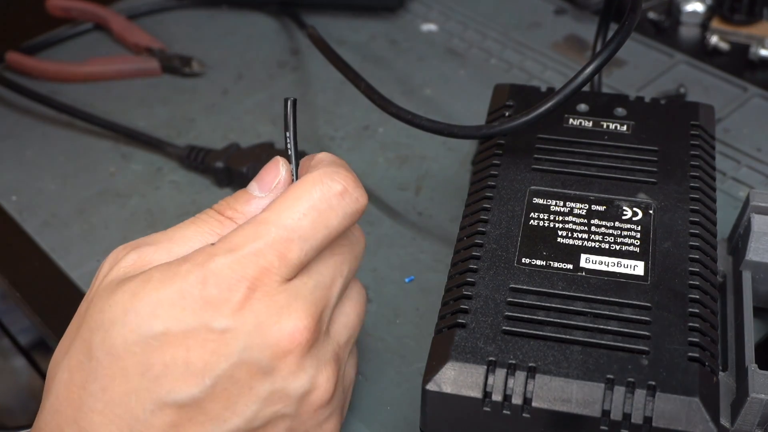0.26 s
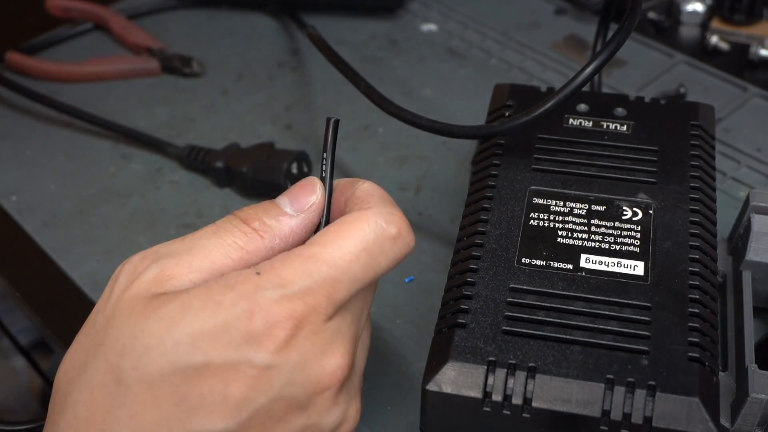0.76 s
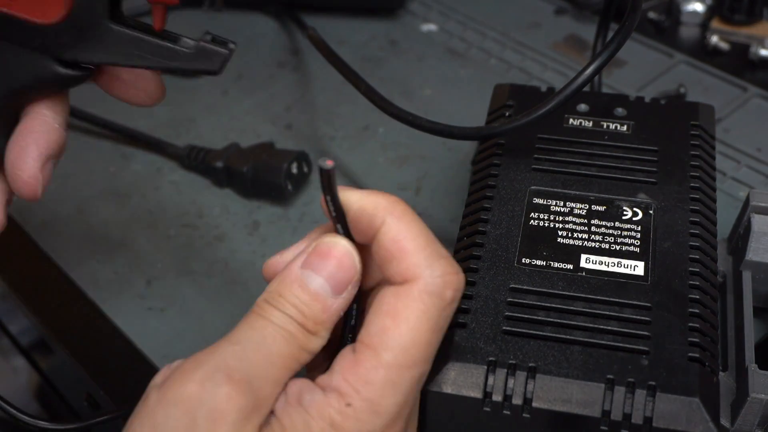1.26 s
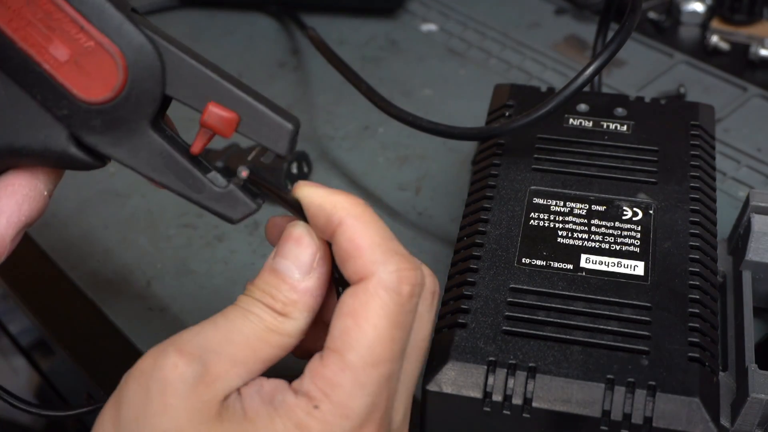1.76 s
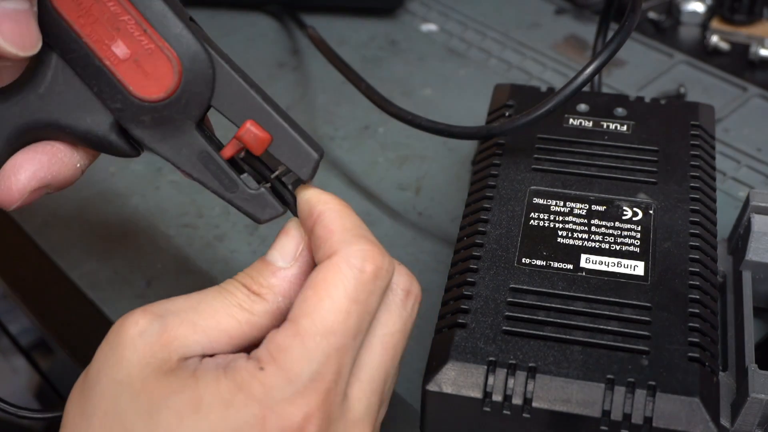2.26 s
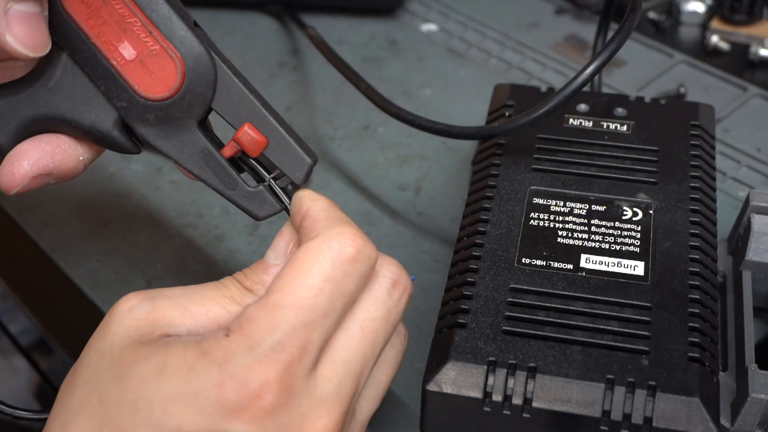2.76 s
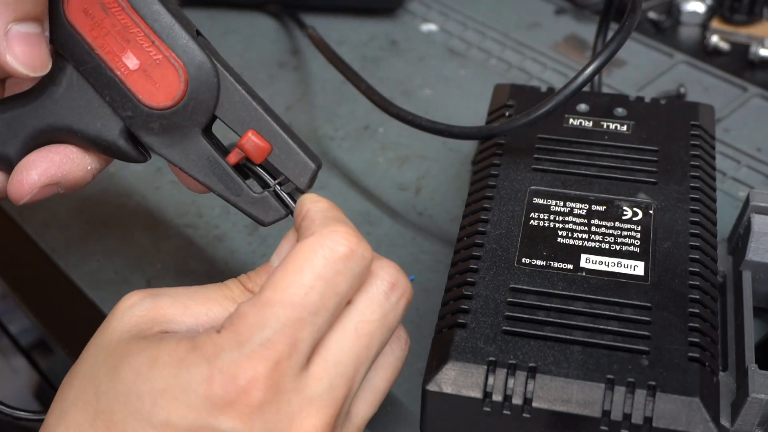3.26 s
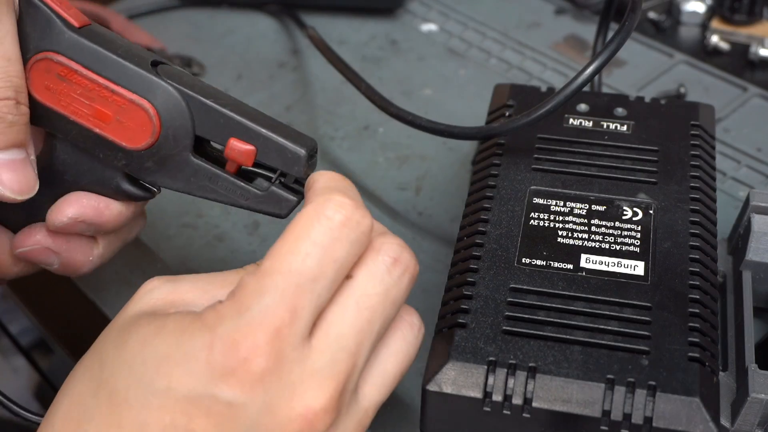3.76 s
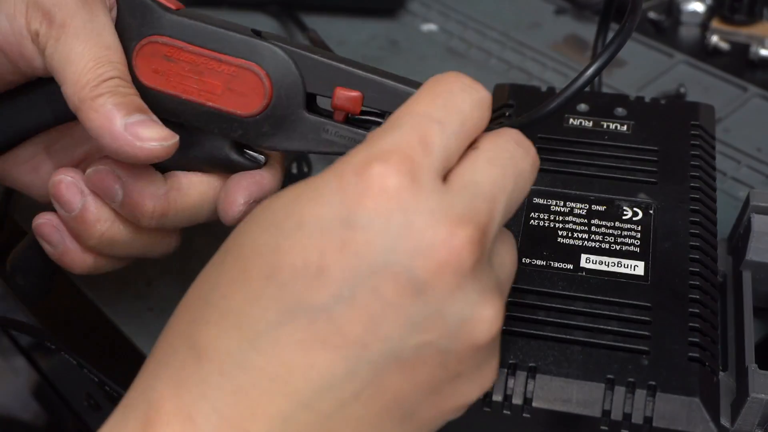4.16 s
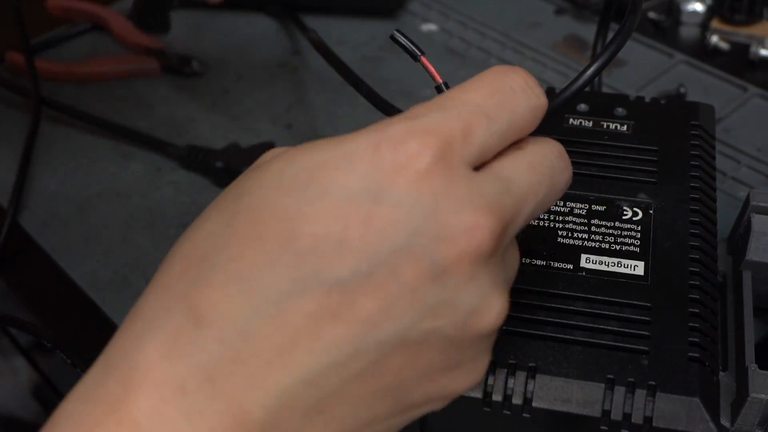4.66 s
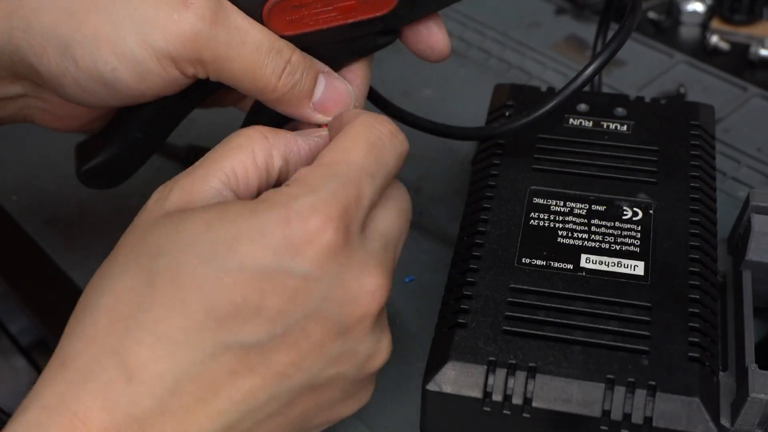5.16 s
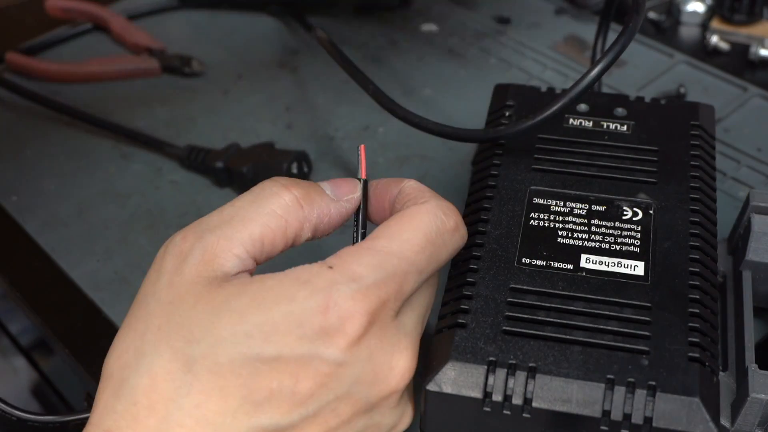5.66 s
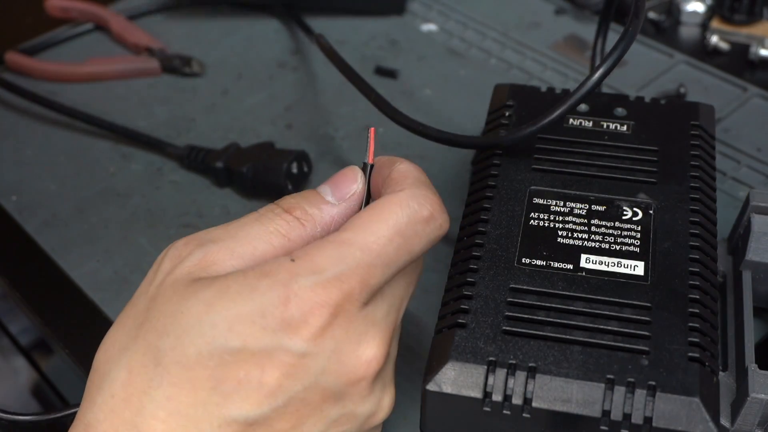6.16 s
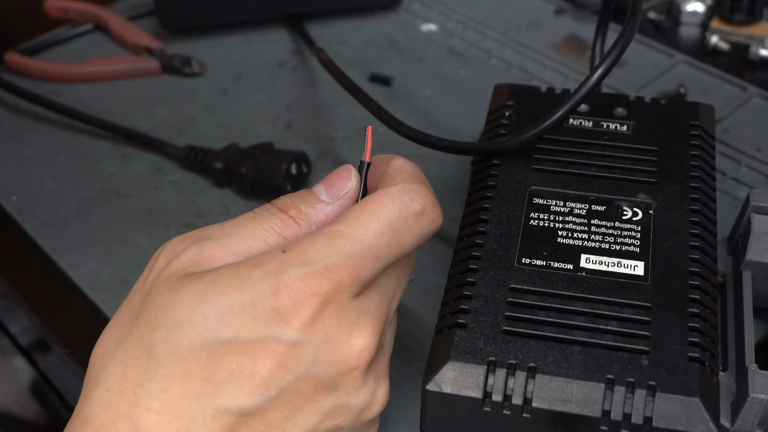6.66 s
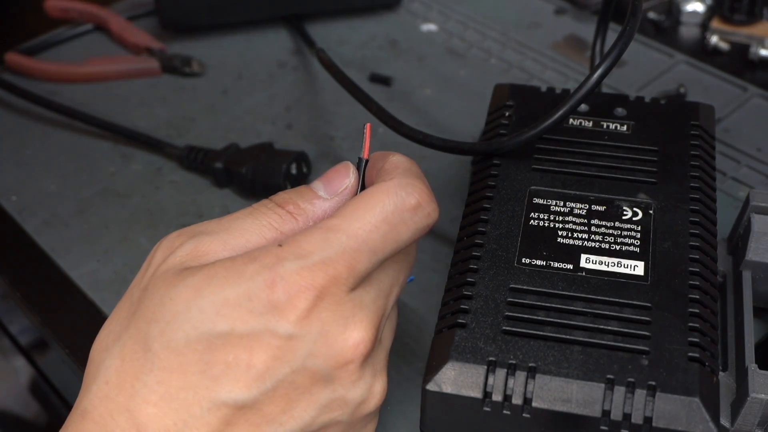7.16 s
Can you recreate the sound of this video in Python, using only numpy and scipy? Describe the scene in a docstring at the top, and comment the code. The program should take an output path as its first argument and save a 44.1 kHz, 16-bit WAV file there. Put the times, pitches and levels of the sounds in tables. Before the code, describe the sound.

A wire stripper clicks and snaps sharply through cable insulation, amid soft finger rubbing and knocks on a workbench.

```python
"""Light clicks and soft scrapes, close up in a small room: a wire stripper is dragged off a bench mat.
Squeezed on a cable, its jaws creak, snap through the insulation with a ring of the return spring and
clatter open. Fingers rub the sleeve off; the tool is laid down and its hollow handle skids over the
bench. The bench booms and sways under the loads, over a low room hum."""
import sys
import numpy as np
from scipy import signal
from scipy.fft import rfft, irfft, next_fast_len
from scipy.io import wavfile

SR = 44100
rng = np.random.default_rng(int(sys.argv[2]) if len(sys.argv) > 2 else 0)


def digitize_waveform(pressure):
    """Quantize a signal to 16-bit integers and store it at the path in sys.argv[1].

    Rows of a 2-D input are taken as channels; values are limited to [-1, 1].
    """
    field = np.atleast_2d(pressure).T
    bounded = np.clip(field, -1, 1)
    quanta = np.round(bounded * 32767).astype(np.int16)
    wavfile.write(sys.argv[1], SR, quanta)


N = 326781
TIME_S = np.arange(N) / SR
TOP_HZ = 16000
ATTACK_SAMPLES = int(.008 * SR)


# jaws, levers, handles: start_s, level_db, bright_db_per_oct
TOOL_CLICKS = [(.0541, -45, -2.5), (.2553, -43, 1), (.4511, -32, 0), (1.3076, -49.5, -8),
               (1.8743, -55.5, -8.5), (2.0178, -56.5, -6), (2.1102, -47, -7.5), (2.3637, -55.5, -5.5),
               (2.795, -65, 10), (3.02, -59, -3), (3.4033, -55, -5), (3.7805, -34.5, -4), (3.8346, -65, 19),
               (3.9669, -28, -2), (4.0247, -48, 5), (4.0753, -40, -5), (4.1728, -42, -5.5), (4.2522, -8, 8),
               (4.2605, -22, -6), (4.4168, -36, 1), (4.4307, -31, 3), (4.4675, -24.5, 4), (4.4923, -15, 7),
               (4.4962, -19.5, 6.5), (4.5536, -30.5, -2), (5.19, -41.5, -1), (5.2048, -29.5, 0),
               (5.2698, -49, 0), (5.472, -29, 3.5), (5.7932, -29, 4.5), (6.152, -38.5, -1.5),
               (6.222, -48, -2), (6.4647, -39, -4), (6.62, -43, 1), (6.6817, -33, 1), (6.719, -37, -1)]
# hand-damped tool body: freq_hz, t60_s, level_db
TOOL_MODES = [(1180, .012, -14.5), (2057, 0.016, -7), (2245, 0.015, -2.5), (2717, 0.0085, 3),
              (3056, 0.035, -2.5), (3564, 0.017, -3), (4130, 0.019, 5), (5884, 0.023, 1.5),
              (6130, .018, -1), (6900, .014, -25.5), (9970, 0.0099, 4.5), (10940, 0.015, -4),
              (12600, 0.021, -3.5)]
# thud, knock, edge against the clack: level_db, offset_oct
CLICK_SHARES = [(-21.5, -1.5), (-7, -1.14), (-12, 1.08)]

def stripper_clicks():
    """Jaws, levers and handles strike and ring the gripped tool."""
    return hits(TOOL_CLICKS, TOOL_MODES, CLICK_SHARES, crack_lo_hz=480, crack_t60_s=.013,
                rattle_db=-8.5, rattle_t60_s=.074, scatter_db=3, detune=.042, soft_s=.00082, muffle=2.2)


def spring_snap(start_s=4.2525, coil_db=-22, lever_db=-37, recoil_db=-25, lo_hz=2500, hi_hz=6300):
    """The snap rings the coil spring in many close modes, shakes the levers and jolts the handle."""
    out, t = np.zeros(N), np.arange(SR // 2) / SR
    position, phase = rng.uniform(size=(2, 160, 1))
    modes_hz = lo_hz * (hi_hz / lo_hz) ** position
    coil = unit(np.sum(np.sin(2 * np.pi * (modes_hz * t + phase)), axis=0))
    add(out, start_s, undb(coil_db) * coil * fall(t, t60_s=.3))
    add(out, start_s, undb(lever_db) * burst(centre_hz=1650, fade_s=.04, width=.5))
    add(out, start_s, undb(recoil_db) * burst(centre_hz=350, fade_s=.0048, width=.93))
    return out


# blows on the bench: start_s, level_db, bright_db_per_oct
BENCH_KNOCKS = [(.7005, -29.5, -4.5), (4.569, -53, 0), (4.9335, -43.5, -3.5), (5.3985, -30.5, 1.5),
                (5.4477, -42, -3), (5.506, -30.5, 2), (5.6633, -60, -10), (5.7579, -60, -6.5),
                (5.828, -55.5, -4.5), (5.9046, -49, -1), (5.9297, -57, -3.5), (6.0458, -41.5, 4),
                (6.1995, -43.5, -0.5), (6.2396, -38, 0.5), (6.2915, -28.5, 2), (6.3193, -11, 5.5),
                (6.3305, -29, 1), (6.3425, -31, 1), (6.424, -42, -3), (6.5869, -47, 6), (6.8234, -42, 1),
                (7.094, -52.5, -3)]
# bench and what lies on it: freq_hz, t60_s, level_db
BENCH_MODES = [(185.2, 0.087, -9.5), (332, 0.028, -6.5), (477, 0.016, -12), (687, 0.039, -0.5),
               (719, 0.016, -5.5), (1080, 0.027, -2.5), (1366, 0.0086, -6.5), (1472, 0.035, -1),
               (2010, 0.012, -1), (2600, 0.049, -9.5), (2858, 0.0062, 0), (3490, .014, 1),
               (3850, 0.012, -5), (5400, 0.01, 1)]
# thud, knock, edge against the clack: level_db, offset_oct
KNOCK_SHARES = [(-6.5, -2.5), (5, -1.37), (-14.5, 0.9)]

def bench_knocks():
    """Tool, cable and hands knock on the bench and rattle what lies on it."""
    return hits(BENCH_KNOCKS, BENCH_MODES, KNOCK_SHARES, crack_lo_hz=550, crack_t60_s=.0073,
                rattle_db=0, rattle_t60_s=.053, scatter_db=3.5, detune=.04, soft_s=.0017, muffle=.39)


# tool and cable on the mat: start_s, swell_s, fade_s, level_db, bright_db_per_oct
MAT_DRAGS = [(.294, 0.0028, 0.012, -39.5, 0.5), (.41, .01, 0.021, -46.5, -2.5),
             (.451, .004, 0.0062, -41.5, 2), (.565, 0.0037, 0.026, -27.5, 1),
             (.593, 0.0047, 0.011, -22, 1.5), (.634, .017, .03, -44.5, -1.5),
             (.699, 0.015, 0.044, -19.5, -1), (.85, 0.0017, 0.016, -30.5, -1.5),
             (.928, 0.0046, 0.014, -36.5, -1), (.985, 0.018, 0.013, -46, -2),
             (1.126, 0.011, 0.047, -73, -11), (3.885, 0.021, 0.015, -56, 2.5),
             (4.462, 0.0065, 0.0026, -38, 5), (4.651, 0.015, 0.012, -55, -1),
             (4.884, 0.006, 0.0046, -43, -1.5), (5.24, 0.034, 0.011, -65, 5),
             (6.132, 0.0022, 0.028, -43.5, 0)]
# soft drag resonances: freq_hz, width_hz, level_db
DRAG_RESONANCES = [(343, 320, 5), (785, 200, -5.5), (1470, 89, -3.5), (1505, 70, 4.5), (2310, 890, -11),
                   (3124, 460, -9), (4124, 520, -6.5), (5900, 850, -12), (7500, 2100, -16),
                   (10000, 3500, -24.5)]
# thud, knock, edge against the clack: level_db, offset_oct
DRAG_SHARES = [(-1.5, -2.4), (.5, -1.6), (-2.5, 3.1)]

def mat_drags(trail_db=-17.5, trail_fade_s=.095, trail_db_per_oct=-2.5):
    """Friction on the mat swells and fades; the cable trails behind, weaker, longer and duller."""
    out, t = np.zeros(N), np.arange(2 * SR // 3) / SR
    for start_s, swell_s, fade_s, level_db, bright in MAT_DRAGS:
        slips = scrape(DRAG_RESONANCES, len(t), grit_db=2)
        after_s = np.maximum(t - swell_s, 0)
        release = np.exp(-after_s / fade_s)
        push = np.minimum(t / swell_s, 1) * release
        trail = (1 - release) * np.exp(-after_s / trail_fade_s)
        tool = voice(slips, level_db, DRAG_SHARES, bright, len(t))
        cable = voice(slips, level_db + trail_db, DRAG_SHARES, bright + trail_db_per_oct, len(t))
        add(out, start_s, push * tool + trail * cable)
    return out


# tool on the bare bench: start_s, landing_db, swell_s, fade_s, skid_db, bright_db_per_oct
HANDLE_SKIDS = [(6.917, -25, 0.037, 0.014, -14.5, 0), (7.035, -36, 0.011, 0.012, -28.5, -2.5),
                (7.1655, -25.5, 0.023, 0.0071, -22, -1)]
# hollow handle: freq_hz, width_hz, level_db
HANDLE_RESONANCES = [(198, 100, 0), (636, 110, -4.5), (1350, 130, -1), (1540, 230, 1.5), (1690, 500, -9),
                     (2250, 580, -11), (2950, 310, -4.5), (3960, 240, -6.5), (5500, 540, -16.5),
                     (10700, 2000, -15.5)]
# thud, knock, edge against the clack: level_db, offset_oct
SKID_SHARES = [(-10, -2.5), (2.5, -1.5), (-16, -0.5)]

def handle_skids(grit_db=4.5, bite_db=-15, bite_s=.0035, landing_fade_s=.0042, landing_db_per_oct=-3):
    """The hollow handle knocks as it lands, bites, presses in and comes to rest."""
    out, t = np.zeros(N), np.arange(SR // 3) / SR
    bite = np.minimum(t / bite_s, 1)
    for start_s, landing_db, swell_s, fade_s, skid_db, bright in HANDLE_SKIDS:
        knock = scrape(HANDLE_RESONANCES, len(t), grit_db) * bite * np.exp(-t / landing_fade_s)
        add(out, start_s, voice(knock, landing_db, SKID_SHARES, bright + landing_db_per_oct))
        press = bite * undb(bite_db * np.maximum(1 - t / swell_s, 0))
        release = np.exp(-np.maximum(t - swell_s, 0) / fade_s)
        slips = scrape(HANDLE_RESONANCES, len(t), grit_db)
        add(out, start_s, press * release * voice(slips, skid_db, SKID_SHARES, bright, len(t)))
    return out


# fingers on cable and handle: start_s, peak_s, end_s, skin_db, hiss_db
FINGER_STROKES = [(0, 0.014, 0.34, -52.5, -66.5), (0.229, 0.28, 0.45, -51, -46),
                  (0.427, 0.526, .565, -50, -43.5), (1.067, 1.415, 1.77, -60, -63),
                  (2.358, 2.515, 2.75, -66, -70.5), (3.401, 3.593, 3.77, -67, -53.5),
                  (3.758, 3.94, 4, -59, -57.5), (4.096, 4.167, 4.53, -55.5, -61.5),
                  (4.724, 4.843, 5.05, -48, -54), (4.993, 4.993, 5.12, -52, -53),
                  (5.06, 5.095, 5.16, -52, -84), (5.2, 5.29, 5.7, -66, -63),
                  (5.5, 5.851, 6.1, -60.5, -61.5), (6.09, 6.33, 6.56, -46, -45.5),
                  (6.617, 6.72, 18, -53, -57)]
# skin friction: freq_hz, density_db
SKIN_SPECTRUM = [(200, -1.5), (700, -4.5), (1450, -1), (1900, -8), (2800, -33.5)]
# sleeve hiss: freq_hz, density_db
SLEEVE_SPECTRUM = [(1100, -20), (1470, 2.5), (1700, -4), (2100, 3), (2600, -8), (3000, 0), (3600, -2),
                   (4300, 0.5), (4900, -5.5), (6000, -1), (7500, -9), (11500, -6.5), (16000, -14)]

def finger_rubs(gain_db=-1, catch_db=-6, grit_db=2.5, uneven_db=2):
    """A murmur of skin friction and a fine, uneven sleeve hiss follow the pressure of each stroke."""
    skin = unit(colour(grains(N, grit_db), SKIN_SPECTRUM)) + undb(catch_db) * sleeve_catches()
    hiss = unit(colour(grains(N, grit_db), SLEEVE_SPECTRUM))
    out = np.zeros(N)
    for start_s, peak_s, end_s, skin_db, hiss_db in FINGER_STROKES:
        pressure = np.sin(np.pi / 2 * np.interp(TIME_S, [start_s, peak_s, end_s], [0, 1, 0]))
        out += pressure * (skin * undb(skin_db) + hiss * undb(hiss_db))
    return out * undb(gain_db + uneven_db * drift(rate_hz=60))


def sleeve_catches(rate_hz=45, fade_s=.0025, spread_db=4):
    """The sleeve catches on the skin in small, dull, random ticks; rms 1."""
    t = np.arange(SR // 40) / SR
    ticks = (rng.uniform(size=N) < rate_hz / SR) * undb(spread_db * rng.standard_normal(N))
    envelope = signal.fftconvolve(ticks, np.exp(-t / fade_s))[:N]
    return unit(band(envelope * rng.standard_normal(N), lo_hz=700, hi_hz=3000, order=2))


# nudged metal tool: freq_hz, t60_s, level_db
NUDGE_MODES = [(336, 0.54, 5), (1540, 0.13, -38), (1836, 0.2, 1)]

def tool_nudge(start_s=.046, level_db=-45):
    """A light touch leaves a metal tool ringing faintly."""
    out, t = np.zeros(N), np.arange(SR // 2) / SR
    add(out, start_s, undb(level_db) * ring(NUDGE_MODES, t))
    return out


# touches at pick-up: start_s, level_db
STEEL_TOUCHES = [(0.2544, -46.5), (.297, -44)]

def steel_pings():
    """A thin, scraped steel part sings roughly around one high note."""
    out = np.zeros(N)
    for start_s, level_db in STEEL_TOUCHES:
        add(out, start_s, undb(level_db) * burst(centre_hz=4280, fade_s=.056, width=.025))
    return out


# dull blows: start_s, level_db, bright_db_per_oct
BENCH_THUMPS = [(.592, -34.5, -7.5), (.65, -34, 0.5), (.708, -25.5, -11.5), (5.49, -41.5, -6.5),
                (6.3193, -29, 5), (6.9215, -24.5, 4.5), (7.039, -34.5, -3.5), (7.168, -47.5, -15.5)]
# bench booms: freq_hz, fade_s, level_db
BENCH_BOOMS = [(92.8, 0.061, -5), (192, .024, -3), (682, 0.011, 3)]

def bench_thumps():
    """Soft thumps stir the lowest boom of the bench, hard ones the highest."""
    out = np.zeros(N)
    middle_hz = BENCH_BOOMS[1][0]
    for start_s, level_db, bright in BENCH_THUMPS:
        for freq_hz, fade_s, share_db in BENCH_BOOMS:
            boom_db = level_db + share_db + bright * np.log2(freq_hz / middle_hz)
            add(out, start_s, undb(boom_db) * burst(freq_hz, fade_s, width=.28))
    return out


# loads on the bench: start_s, level_db
BENCH_LOADS = [(.45, -41), (0.704, -35.5), (1.303, -32), (3.751, -46.5), (5.491, -35.5), (6.36, -27.5),
               (6.949, -37.5)]
# slow bench modes: freq_hz, t60_s, level_db
SWAY_MODES = [(22.7, 1.9, 2.5), (57.4, 2.7, -7), (85, 0.17, -8)]

def bench_sway(build_s=.017):
    """The bench top swings in its lowest modes after each load."""
    out, t = np.zeros(N), np.arange(2 * SR) / SR
    sway = sum(undb(db) * fall(t, t60_s) * np.sin(2 * np.pi * hz * t) for hz, t60_s, db in SWAY_MODES)
    for start_s, level_db in BENCH_LOADS:
        add(out, start_s, undb(level_db) * sway * np.minimum(t / build_s, 1))
    return out


def room(x, early_db=-11, early_t60_s=.1, late_db=-15, late_t60_s=.26, treble_db=-2, build_s=.015):
    """Bench and shelves throw back early echoes; the diffuse tail is each band's energy dying away."""
    t = np.arange(SR // 2) / SR
    echoes = rng.standard_normal(len(t)) * fall(t, early_t60_s) * (t > .002)
    out = x + undb(early_db) * signal.fftconvolve(x, echoes / np.linalg.norm(echoes))[:N]
    decay = (fall(t, late_t60_s) * np.minimum(t / build_s, 1)) ** 2
    edges_hz = np.geomspace(110, 17000, 13)
    for tilt_db, lo_hz, hi_hz in zip(np.linspace(0, treble_db, 12), edges_hz, edges_hz[1:]):
        energy = signal.fftconvolve(band(x, lo_hz, hi_hz) ** 2, decay / decay.sum())[:N]
        noise = unit(band(rng.standard_normal(N), lo_hz, hi_hz))
        out += undb(late_db + tilt_db) * np.sqrt(np.maximum(energy, 0)) * noise
    return out


# still room air: freq_hz, density_db
AIR_SPECTRUM = [(12, -47), (20, -9.5), (65, -3.5), (130, -18), (146, -23.5), (262, -24.5), (337, -15.5),
                (388, -31), (434, -25), (1120, -36.5), (1370, -32), (2390, -43), (10500, -45), (13900, -38),
                (16000, -44.5)]

def room_tone(air_db=-51.5, hum_db=-69.5, hum_hz=56.3, waver_hz=6, waver_db=3):
    """Steady room noise with a low, wavering hum."""
    pitch_hz = hum_hz + waver_hz * drift(rate_hz=16)
    hum = np.sin(2 * np.pi * np.cumsum(pitch_hz) / SR) * undb(waver_db * drift(rate_hz=1.7))
    air = colour(rng.standard_normal(N), AIR_SPECTRUM)
    return undb(air_db) * unit(air) + undb(hum_db) * unit(hum)


def hits(blows, modes, shares, crack_lo_hz, crack_t60_s, rattle_db, rattle_t60_s,
         scatter_db, detune, soft_s, muffle, crack_db=8):
    """Each blow is a hard crack, the ring of the body and a short rattle of loose parts."""
    out, t = np.zeros(N), np.arange(SR // 6) / SR
    hardest_db = max(level_db for _, level_db, _ in blows)
    for start_s, level_db, bright in blows:
        body = ring(modes, t, scatter_db, detune, tilt_db_per_oct=muffle * min(bright, 0))
        crack = undb(crack_db) * rng.standard_normal(len(t)) * fall(t, crack_t60_s)
        rattle = undb(rattle_db) * grains(len(t), spread_db=1.5) * fall(t, rattle_t60_s)
        blow = body / np.std(body[:ATTACK_SAMPLES]) + band(crack + rattle, crack_lo_hz, TOP_HZ, order=2)
        rise_s = soft_s * (1 - undb(level_db - hardest_db)) + 1 / SR  # lighter blows build more slowly
        add(out, start_s, voice(blow * np.minimum(t / rise_s, 1), level_db, shares, bright))
    return out


def ring(modes, t, scatter_db=0, detune=0, tilt_db_per_oct=0):
    """A struck body's decaying modes; contact point and grip weight and shift them anew each time."""
    hz, t60_s, db = np.transpose(modes)[:, :, None]
    weight, shift, side = rng.standard_normal((3, len(modes), 1))
    gain = np.sign(side) * undb(db + scatter_db * weight + tilt_db_per_oct * np.log2(hz / hz.mean()))
    return np.sum(gain * fall(t, t60_s) * np.sin(2 * np.pi * hz * (1 + detune * shift) * t), axis=0)


def scrape(resonances, size, grit_db):
    """Sliding plastic catches and slips densely, driving the resonances of what is rubbed."""
    return sum(undb(db) * signal.lfilter(*signal.iirpeak(hz, hz / width_hz, fs=SR), grains(size, grit_db))
               for hz, width_hz, db in resonances)


# clack, thud, knock, edge registers: low_hz, high_hz
CONTACT_BANDS = [(2000, 7000), (170, 900), (900, 2000), (7000, 16000)]

def voice(x, level_db, shares, bright_db_per_oct, rms_samples=ATTACK_SAMPLES):
    """Contact hardness: brightness tips thud, knock and edge about the clack, which is at level_db."""
    gains_db = [0] + [share_db + bright_db_per_oct * offset_oct for share_db, offset_oct in shares]
    parts = [band(x, lo_hz, hi_hz) for lo_hz, hi_hz in CONTACT_BANDS]
    return sum(undb(level_db + gain_db) * part / np.sqrt(np.mean(part[:rms_samples] ** 2))
               for gain_db, part in zip(gains_db, parts))


def burst(centre_hz, fade_s, width):
    """Band noise that dies away from a level near 1."""
    envelope = np.exp(-np.arange(SR // 2) / SR / fade_s)
    noise = rng.standard_normal(len(envelope)) * envelope
    noise = band(noise, centre_hz / (1 + width), centre_hz * (1 + width), order=2)
    return noise * np.linalg.norm(envelope) / np.linalg.norm(noise)


def grains(size, spread_db):
    """Dense micro-slips of uneven strength; rms 1."""
    strength = undb(spread_db * np.minimum(rng.exponential(size=size // 16 + 1), 5))
    return unit(rng.standard_normal(size) * np.repeat(strength, 16)[:size])


def drift(rate_hz):
    """Random wander with a spread near 1."""
    knots = rng.standard_normal(4096)
    return np.interp(TIME_S * rate_hz, np.arange(len(knots)), knots)


def colour(x, spectrum):
    """Shape x by (freq_hz, gain_db) points."""
    hz, db = np.transpose(spectrum)
    size = next_fast_len(len(x))
    bins_hz = np.maximum(np.arange(size // 2 + 1) * SR / size, 1)
    gain = undb(np.interp(np.log(bins_hz), np.log(hz), db))
    return irfft(rfft(x, size) * gain, size)[:len(x)]


def band(x, lo_hz, hi_hz, order=3):
    """Causal band-pass."""
    return signal.sosfilt(signal.butter(order, [lo_hz, hi_hz], "band", fs=SR, output="sos"), x)


def fall(t, t60_s):
    """Exponential decay, 60 dB down at t60_s."""
    return np.exp(-np.log(1000) * t / t60_s)


def add(out, start_s, x):
    """Mix x into out from start_s on."""
    i = int(start_s * SR)
    out[i:i + len(x)] += x[:N - i]


def undb(db):
    """Decibels to gain."""
    return 10 ** (np.asarray(db) / 20)


def unit(x):
    """Scale to rms 1."""
    return x / np.sqrt(np.mean(x ** 2) + 1e-20)


def scene():
    """Tool, bench and fingers in the room; mono."""
    handling = (stripper_clicks() + bench_knocks() + spring_snap()
                + mat_drags() + handle_skids() + finger_rubs())
    return (room(handling) + tool_nudge() + steel_pings() + bench_thumps() + bench_sway() + room_tone())[None]


# microphone response: freq_hz, gain_db
MIC_RESPONSE = [(100, 1), (500, -1), (1000, -1.5), (3000, 0.5), (6200, 0), (7800, -2), (10500, 0),
                (13000, -1), (15500, -6.5)]

def record(dry):
    """The microphone softens the treble; peaks clip at full scale; the top is cut."""
    clipped = np.clip(colour(dry[0], MIC_RESPONSE), -1, 1)[None]
    return signal.sosfilt(signal.ellip(10, .1, 70, TOP_HZ, fs=SR, output="sos"), clipped)


dry = scene()
out = record(dry)
digitize_waveform(out)
```